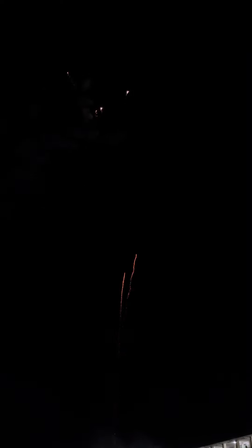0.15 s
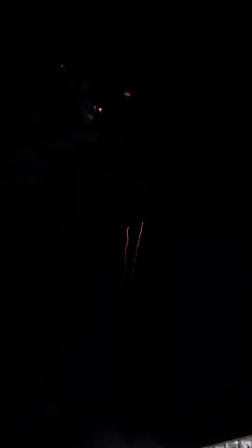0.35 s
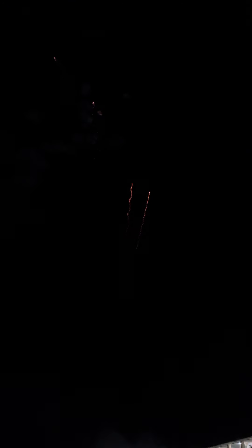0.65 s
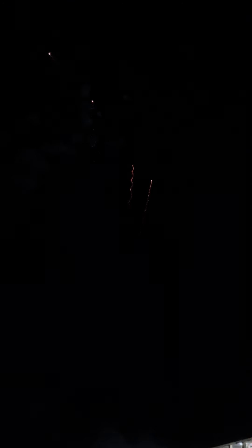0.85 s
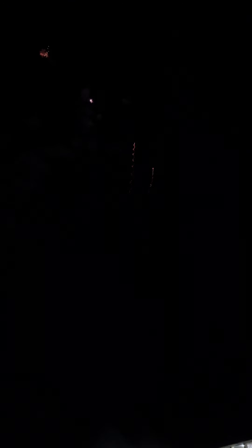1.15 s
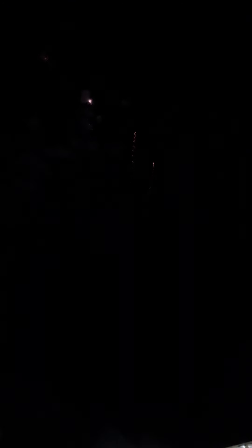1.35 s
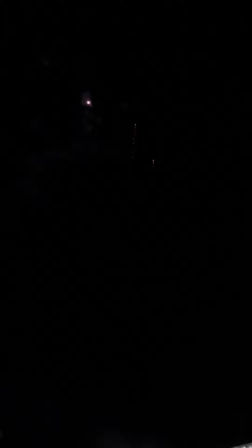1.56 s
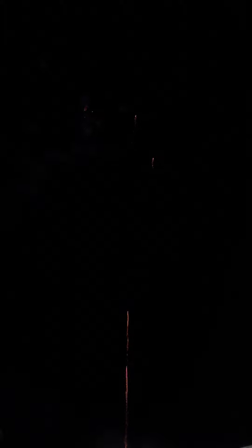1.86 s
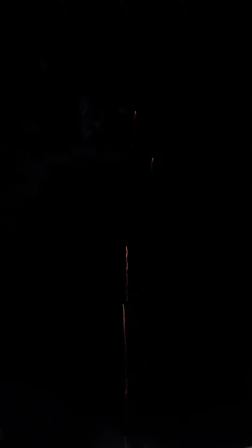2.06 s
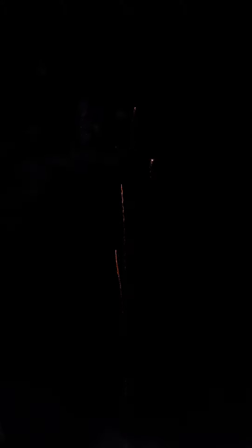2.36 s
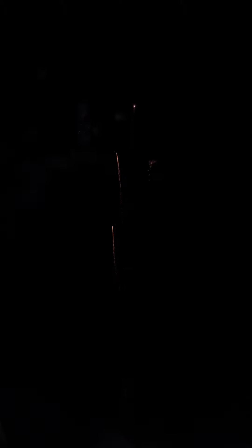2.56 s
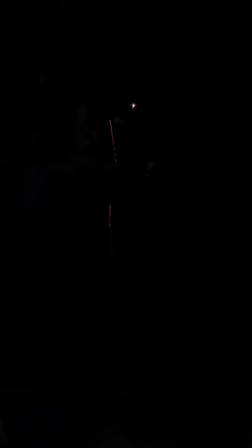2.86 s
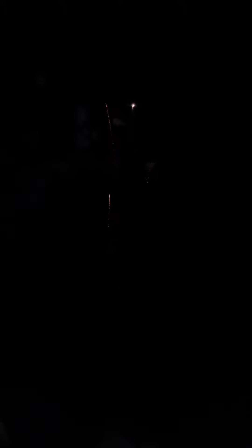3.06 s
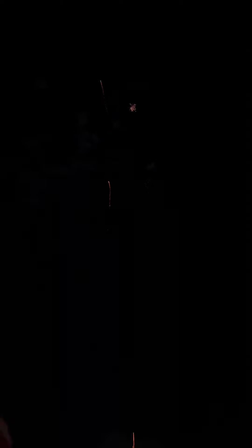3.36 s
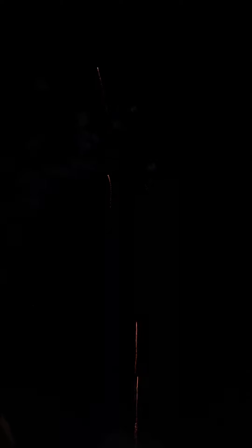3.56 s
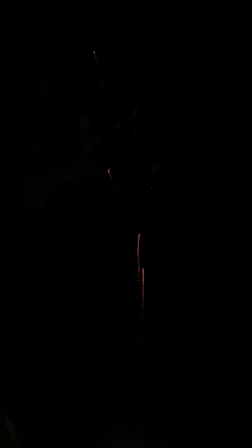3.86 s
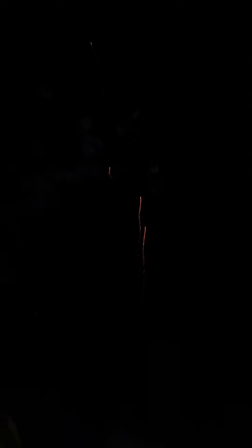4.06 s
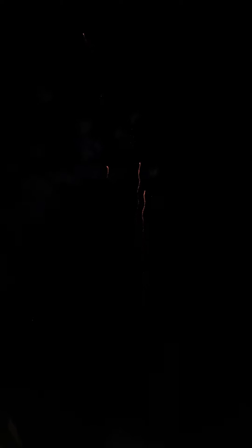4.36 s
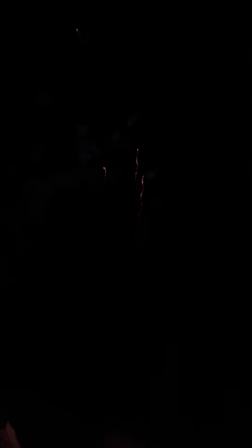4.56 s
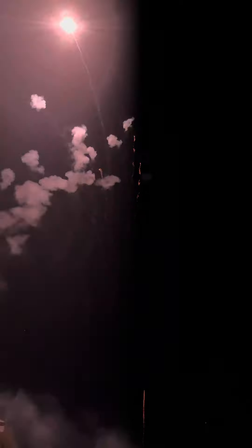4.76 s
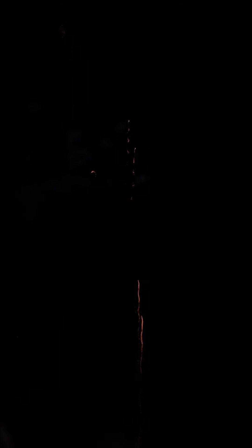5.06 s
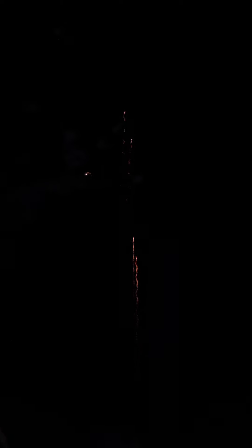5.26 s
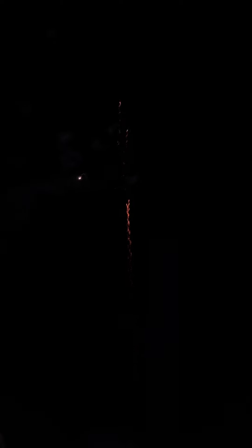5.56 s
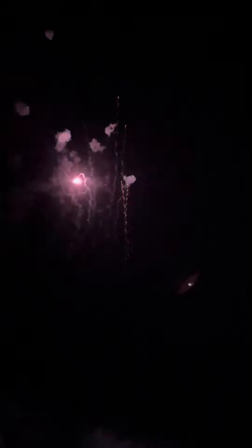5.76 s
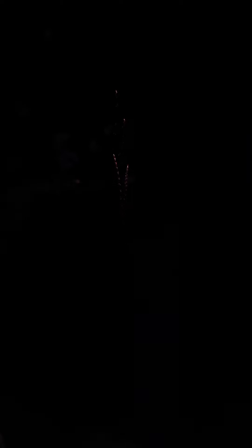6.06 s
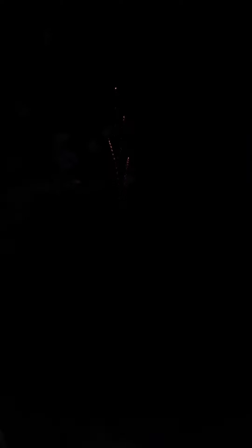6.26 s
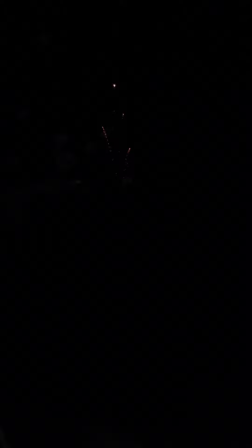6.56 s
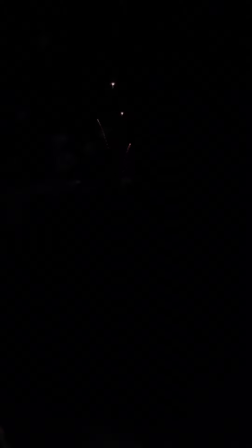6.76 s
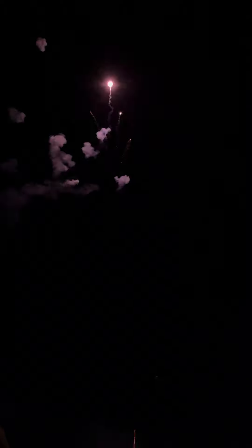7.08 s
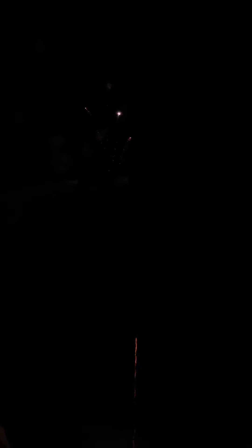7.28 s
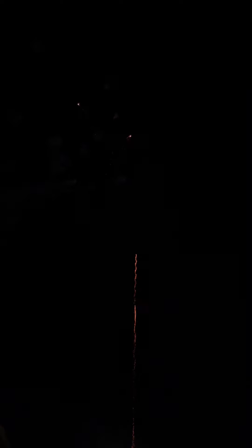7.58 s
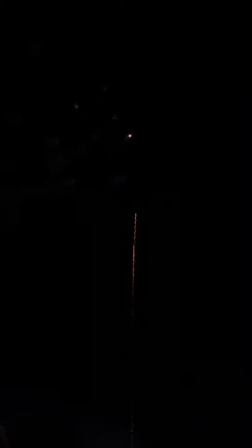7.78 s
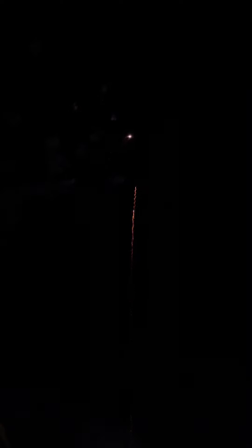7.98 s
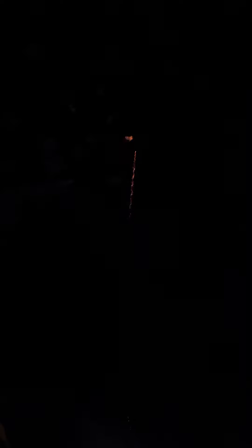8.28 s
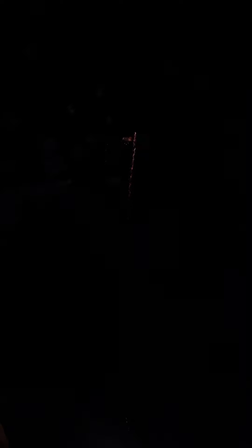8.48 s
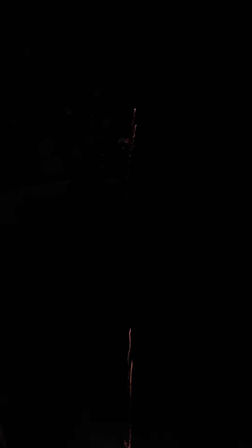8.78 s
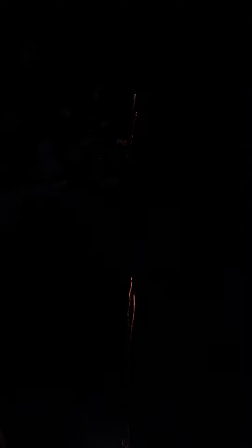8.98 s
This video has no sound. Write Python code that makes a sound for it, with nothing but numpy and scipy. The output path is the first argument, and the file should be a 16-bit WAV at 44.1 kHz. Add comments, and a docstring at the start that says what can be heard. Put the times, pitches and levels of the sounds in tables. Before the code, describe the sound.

Sharp firework bangs crack high overhead every half second to second and a half, each rolling into deep echoing rumble, with dull mortar thumps between.

```python
"""Sharp salute-shell cracks burst high over open ground at night; mortars nearby hiss, thump and ring.
Each blast is a pressure jump with a suction tail, heard direct and again off the ground and walls.
Far walls and trees answer as a rumble of band-filtered noise that dies away band by band.
Broad peaks and dips colour the whole stereo sound, all-pass filters smear each blast into a falling
chirp, and a limiter holds the peaks."""
import sys
import numpy as np
from scipy import signal
from scipy.io import wavfile
from scipy.ndimage import uniform_filter1d, minimum_filter1d

SR = 44100
rng = np.random.default_rng(int(sys.argv[2]) if len(sys.argv) > 2 else 0)


def bounce(signal):
    """Save signal as a 16-bit WAV file at the path given by the first command-line argument."""
    frames = np.transpose(np.atleast_2d(signal))
    limited = np.clip(frames, -1, 1)
    pcm = np.round(limited * 32767).astype(np.int16)
    wavfile.write(sys.argv[1], SR, pcm)


N = 402633
STEP = 64        # samples between values of a slow control signal
RUN_IN = 4096    # samples that sound before the first moment
BLAST_S = 0.0028    # time constant of a shell's blast
GROUND_BASS_DB = -9.5    # long waves in the ground bounce, relative to the blast
# Shell bursts: (time [s], blast level [dB], ground bounce lag [ms], lag of the big wall's answer [ms])
SHELL_BURSTS = [(0.638, 13, 7.1, 80), (0.948, 11.5, 6.5, 74), (1.4415, 13.5, 7.7, 87),
                (2.047, 13.5, 7.3, 89), (2.771, 12, 6.7, 85), (3.6934, 11.5, 7.1, 88),
                (5.1418, 13, 7.9, 54), (6.12, 12.5, 6.2, 60), (7.4749, 12.5, 7.1, 92), (7.797, 11, 7.3, 88),
                (8.0656, 12, 7.5, 85), (8.6202, 10.5, 6.8, 98)]
# Mortar launches: (time [s], gas jet level [dB], jet whistle [Hz], thump level before shared gains [dB],
# colour of the wall slap [Hz], wall slap level [dB])
MORTAR_LAUNCHES = [(-0.0615, -31, 2770, 1, 1130, -4), (1.763, -23.5, 2500, 0.5, 1070, -7),
                   (1.8066, -31, 2500, 0.5, 1080, -12), (3.4677, -21, 2820, 0.4, 1130, -3),
                   (3.5755, -24, 2880, 1, 1060, -5), (4.773, -23, 3020, -0.5, 894, -4),
                   (4.8944, -19.5, 3740, 2.3, 960, -3), (7.15, -27.5, 2900, -3.5, 1450, -3),
                   (7.4065, -25, 2730, 0, 950, 1), (8.594, -26, 2860, 1, 1100, 1),
                   (8.725, -30.5, 3200, -5, 1080, -6)]


def from_db(db):
    """A level is a logarithm of amplitude: 20 dB for each factor of ten."""
    return 10 ** (np.asarray(db) / 20)


def at_hz(points, hz):
    """Spectral curves are interpolated on a logarithmic frequency axis."""
    log_hz, values = np.log(np.array(points)[:, 0]), np.array(points)[:, 1]
    return np.interp(np.log(hz), log_hz, values)


def drift(rate):
    """Low-passed noise wanders slowly: spread 1, corner at rate [Hz], one value every STEP samples."""
    r = np.exp(-2 * np.pi * rate * STEP / SR)
    white = rng.standard_normal(N // STEP + 1002)
    slow = signal.lfilter([1], [1, -2 * r, r * r], white)[1000:]
    return slow / slow.std()


def clicks(times, db):
    """An impulse is one sample at its moment, over a floor far below hearing."""
    out = np.full(N, 1e-18)
    samples = np.clip(np.round(np.asarray(times) * SR).astype(int), 0, N - 1)
    np.add.at(out, samples, from_db(db))
    return out


def dull(x, hz):
    """A first-order loss: one-pole low-pass."""
    r = np.exp(-2 * np.pi * hz / SR)
    return signal.lfilter([1 - r], [1, -r], x)


def resonance(x, hz, width_hz):
    """A damped oscillator passes a band round its own frequency: two poles, gain 1 on top."""
    r, w = np.exp(-np.pi * width_hz / SR), 2 * np.pi * hz / SR
    return signal.lfilter([(1 - r * r) / 2, 0, (r * r - 1) / 2], [1, -2 * r * np.cos(w), r * r], x)


def blast(x, length_s):
    """A blast wave jumps, then sags into suction: (1 - t/T) exp(-t/T), here with inverted sign."""
    r = np.exp(-1 / (length_s * SR))
    return -signal.lfilter([1, -1], [1, -2 * r, r * r], x)


def onset_db(age, rise_s):
    """Echo build-up: silence before the blast, then a straight rise in amplitude."""
    return 20 * np.log10(np.clip(age / rise_s, 1e-9, 1))


def shifted(x, lag_s):
    """Travel time delays a wave, even by a fraction of a sample."""
    return np.interp(np.arange(N) - lag_s * SR, np.arange(N), x)


def bursts():
    """Blast waves superpose: direct, near bounces, scattered spray and a duller ground bounce."""
    scatter_db, scatter_s, scatter_low_hz = -14, .006, 3500
    near_s, near_db, near_spread_db, near_low_hz = 0.0037, -20, 4, 450
    holder_s, holder_db = .00155, -8    # a second shock off whoever holds the microphones
    ground_db = [-3.5, -12]    # left, right
    ground_dull_hz, ground_bass_hz, ground_left_late_ms = 3800, 166, 0.23
    fence_s, fence_db, fence_dull_hz = .019, -15, 500    # something broad a few steps away
    blast_dull_hz = 2970
    s, level_db, lag_ms = np.transpose(SHELL_BURSTS)[:3]
    s = s + .0007    # the jump follows the first rise
    # Small things close by throw back a short spray of treble.
    fading = np.exp(-np.arange(round(0.084 * SR)) / SR / scatter_s)
    spray = signal.fftconvolve(clicks(s + 0.0017, level_db + scatter_db), fading)[:N]
    chance = rng.standard_normal((len(s), 2))
    out = []
    for side in range(2):
        bounces = spray * rng.standard_normal(N) * (rng.random(N) < .15)
        for _ in range(2):    # bass removed twice
            bounces = bounces - dull(bounces, scatter_low_hz)
        # The near bounce has its own lag and level for every shell.
        bounce_s = s + near_s + 0.0007 * chance[:, 0]
        near = clicks(bounce_s, level_db + near_db + near_spread_db * chance[:, 1])
        near += clicks(s + holder_s, level_db + holder_db)
        direct = clicks(s, level_db) + bounces + near - dull(near, near_low_hz)
        ground_s = s + (lag_ms + ground_left_late_ms * (1 - side)) / 1000
        ground = dull(clicks(ground_s, level_db + ground_db[side]), ground_dull_hz)
        ground += dull(clicks(ground_s, level_db + GROUND_BASS_DB), ground_bass_hz)
        out.append(dull(blast(direct + ground, BLAST_S), blast_dull_hz))
    out, lag = np.array(out), round(fence_s * SR)
    out[:, lag:] += from_db(fence_db) * dull(out[:, :-lag], fence_dull_hz)
    return out


def launches():
    """Gas leaks past the climbing shell, the muzzle thumps, the tube resonates and walls reflect."""
    rise_s, fall_s, peak_s = 0.0055, 0.0025, .001    # the hiss peaks just after the shell leaves
    jet_band_hz, jet_width_hz, jet_ring_db = [1700, 7440], 800, 6    # the gap whistles broadly
    top_hz, top_width_hz, top_db = 6000, 1150, 0.5    # and rings higher up
    thump_s, thump_dull_hz, thump_gain_db = 0.00048, 273, 11.5
    backflow_s, backflow_db = .0041, -5.4    # air rushes back: the same pulse upside down
    slap_s, slap_width_hz = .0325, 400    # the nearer wall returns part of the muzzle's jump
    fray_s, fray_db = .014, -6    # that wall is uneven: its slap frays
    far_wall_s, far_wall_db = .063, -8    # a farther wall returns the whole launch
    # Air modes of the mortar tube: (frequency [Hz], width [Hz], level [dB])
    tube_modes = [(66.3, 5.9, 27), (449, 28.6, 10.5)]
    s, jet_db, jet_hz, thump_db, slap_hz, slap_db = np.transpose(MORTAR_LAUNCHES)
    exit_s = s + 0.0029 + RUN_IN / SR
    t = np.arange(round(0.025 * SR)) / SR
    swell = np.where(t < rise_s, t / rise_s, np.exp(-(t - rise_s) / fall_s))

    noise = rng.standard_normal(N) + 1.16 * rng.standard_normal((2, N))    # partly shared by the sides
    hiss = signal.sosfilt(signal.butter(2, jet_band_hz, "band", fs=SR, output="sos"), noise)
    hiss += from_db(top_db) * resonance(hiss, top_hz, top_width_hz)
    jet = np.zeros((2, N))
    starts = ((exit_s + peak_s - rise_s) * SR).astype(int)
    for start, level_db, hz in zip(starts, jet_db, jet_hz):
        span = slice(start, start + len(t))
        gas = hiss[:, span]
        whistling = gas + from_db(jet_ring_db) * resonance(gas, hz, jet_width_hz)
        jet[:, span] = from_db(level_db) * swell * whistling

    shot = clicks(exit_s, thump_db)
    muzzle = blast(shot, thump_s)
    pushed = muzzle - blast(clicks(exit_s + backflow_s, thump_db + backflow_db), thump_s)
    # The muzzle points away, so its thump arrives dull.
    thump = from_db(thump_gain_db) * signal.lfilter(*signal.butter(2, thump_dull_hz, fs=SR), pushed)
    direct = jet + thump
    for hz, width_hz, level_db in tube_modes:
        direct += from_db(level_db) * resonance(thump, hz, width_hz)

    fraying = signal.fftconvolve(shot, np.exp(-t / fray_s))[:N]
    fraying = fraying * rng.standard_normal((2, N)) * (rng.random((2, N)) < .03)
    frayed = muzzle + from_db(fray_db) * blast(fraying, thump_s)
    out = direct.copy()
    lag, length = round(slap_s * SR), len(t) + 300
    for start, hz, level_db in zip((exit_s * SR).astype(int), slap_hz, slap_db):
        slap = resonance(frayed[:, start:start + length], hz, 2 * slap_width_hz)
        slap = resonance(slap, hz, slap_width_hz)
        out[:, start + lag:start + lag + length] += from_db(level_db) * slap
    lag = round(far_wall_s * SR)
    out[:, lag:] += from_db(far_wall_db) * direct[:, :-lag]
    return np.pad(out[:, RUN_IN:], [(0, 0), (0, RUN_IN)])


def echoes():
    """Specular reflection off large walls returns whole blasts; uneven surfaces dull and fray them."""
    wall_gain_db, wall_spread_db = -13, 5    # one big wall answers every burst
    fray_s, fray_db, echo_dull_hz = 0.0068, -17, 473
    # Single echoes, loud and faint, within the rumble: (time [s], level [dB])
    single_echoes = [(0.053, -11), (0.182, -17), (0.241, -15), (0.794, -1.5), (1.134, 0.5), (1.169, 1),
                     (1.256, -20.5), (1.673, 2.5), (1.745, -2), (2.251, 1), (2.293, -4.5), (2.421, -1),
                     (3.034, -9), (3.16, -19), (3.879, -3), (3.941, -6), (4.104, -33), (4.291, -15),
                     (4.339, -11.5), (5.32, 0), (5.414, -2.5), (5.464, 3), (5.513, -1), (5.672, -6),
                     (5.764, -7.5), (5.825, -13), (6.21, -6), (6.294, 1.5), (6.378, -8), (6.473, -14),
                     (6.525, -11), (6.728, -11.5), (6.775, -11), (7.626, 1.5), (8.236, -6.5), (8.355, -11),
                     (8.667, 0.5), (8.875, -11), (8.954, -5.5), (9.021, -12)]
    burst_s, burst_db, lag_ms, wall_ms = np.transpose(SHELL_BURSTS)
    wall_s = burst_s + wall_ms / 1000
    wall_db = burst_db + wall_gain_db + wall_spread_db * rng.standard_normal(len(SHELL_BURSTS))
    wall = clicks(wall_s, wall_db)
    wall += clicks(wall_s + lag_ms / 1000, wall_db + GROUND_BASS_DB)    # the ground bounce returns too
    fronts = wall + clicks(*np.transpose(single_echoes))
    fading = np.exp(-np.arange(round(.05 * SR)) / SR / fray_s)
    fraying = signal.fftconvolve(fronts, fading)[:N]
    fraying = fraying * rng.standard_normal((2, N)) * (rng.random((2, N)) < .03)
    returned = blast(fronts + from_db(fray_db) * fraying, BLAST_S)
    return dull(dull(returned, echo_dull_hz), echo_dull_hz)


def whooshes():
    """Narrow-band noise: hiss through two equal resonances, quick to rise and slow to fade."""
    # Hiss that hangs in the air after launches, perhaps the climbing shells:
    # (start [s], length [s], centre [Hz], width of each resonance [Hz], level [dB])
    hisses = [(0.036, 0.59, 920, 130, -43), (1.818, 0.055, 2570, 301, -38), (1.932, 0.045, 2740, 500, -41),
              (1.977, 0.099, 2720, 600, -46), (4.843, 0.035, 2520, 505, -41),
              (4.925, 0.088, 2740, 248, -45), (7.204, 0.034, 2090, 260, -43), (7.31, 0.13, 2400, 303, -50)]
    flicker_db = 2.5
    t, out, noise = np.arange(N) / SR, 0, rng.standard_normal((2, N))
    for start_s, length_s, hz, width_hz, level_db in hisses:
        narrow = resonance(resonance(noise, hz, width_hz), hz, width_hz)
        # The end values hold outside the hiss as a faint residue.
        shape = np.interp((t - start_s) / length_s, [0, .1, .7, 1], [0.0013, 1, 0.46, 0.012])
        shape *= from_db(flicker_db * np.repeat(drift(10.0), STEP)[:N])
        out = out + from_db(level_db) * shape * narrow / narrow.std()
    return out


def rumble(patchy_db):
    """Diffuse reverberation: countless echoes add in power and decay exponentially in each band."""
    # Spectrum of the rumble: (frequency [Hz], level of the noise density [dB])
    spectrum = [(25, -48), (45, -18.5), (75, 2.5), (120, 2), (200, -1), (300, -12), (400, -7.5), (750, -16),
                (1050, -17), (1600, -31.5), (3000, -39.5), (4000, -38), (6000, -34.5), (7600, -50.5),
                (9300, -60), (11500, -38), (16000, -63)]
    # Reverberation time: (frequency [Hz], time to fall 60 dB [s])
    decay_times = [(40, 2.08), (120, 1.846), (400, 1.453), (1500, 1.54), (2600, 1.65), (3600, 1.77),
                   (5000, 1.233), (12000, 0.87)]
    # Left-right correlation: (frequency [Hz], likeness, clipped to -1..1 after interpolation)
    likeness = [(60, 0.99), (150, 0.98), (380, 0.96), (700, 0.34), (1300, -0.26), (2400, 0.73),
                (6000, 0.93), (9000, 0.94), (12000, -1.6)]
    # Balance: (frequency [Hz], left over right [dB])
    balance = [(60, 0.5), (150, -4), (380, -1), (950, -6), (2380, 0.5), (5980, -1.5), (15000, -1.5)]
    # Launch rumble over the thump level, added to the spectrum: (frequency [Hz], level [dB])
    launch_colour = [(40, 17), (100, -3), (420, -2.5), (700, -3), (1400, 3), (2000, 4.5), (2800, 8),
                     (4500, 4), (12000, 1.5)]
    # How unevenly echoes arrive: (frequency [Hz], level per unit of shared drift [dB])
    lumpiness = [(60, -0.5), (300, -0.12), (1500, 0.45), (8000, 1)]
    earlier_s, earlier_db = -1.1, 6    # a burst already rolling away
    burst_gain_db, onset_s = -12, 0.0066    # first echoes build up
    growth_db_s = 6.5    # ever more ground answers a burst high in the air
    trees_s, trees_spread_s, trees_db = 0.16, 0.032, 5.5    # far tree line and walls join in
    launch_gap_s, launch_onset_s = 0.012, 0.034    # open ground round the mortars
    gap_db = -11    # shrubs still scatter a little in the gap
    bass_late_cycles, bass_latest_s = 9, 0.064    # long waves need big, far reflectors
    night_db, night_dull_hz = -24, 5500    # far hum of the area, shaped by the spectrum, treble lost
    t = np.arange(N // STEP + 2) * STEP / SR
    far_rows = [(earlier_s, earlier_db)] + [row[:2] for row in SHELL_BURSTS]
    far_s, far_db = np.transpose(far_rows)[:, :, None]
    near_s, near_db = np.transpose([row[:4:3] for row in MORTAR_LAUNCHES])[:, :, None]
    age = np.maximum(t - np.concatenate([far_s, near_s]), 0)
    lumps = drift(11.8) + 0.3 * drift(32.0)    # stronger echoes lift neighbouring bands together
    white = rng.standard_normal((2, 2, N + RUN_IN))
    edges = 22 * 2 ** np.arange(0, 9.6, 1 / 3)    # third octaves
    out = 0
    for k, (low, high) in enumerate(zip(edges, edges[1:])):
        hz = np.sqrt(low * high)
        since = t - far_s - min(bass_late_cycles / hz, bass_latest_s)
        far = far_db + burst_gain_db + onset_db(since, onset_s)
        far += growth_db_s * np.minimum(since, 1.2)
        far += trees_db * (1 + np.tanh((since - trees_s) / trees_spread_s)) / 2
        walls_db = onset_db(t - near_s - launch_gap_s, launch_onset_s)
        shrubs_db = gap_db + onset_db(t - near_s, onset_s)
        near = near_db + at_hz(launch_colour, hz) + np.maximum(walls_db, shrubs_db)
        dying_db = np.concatenate([far, near]) - 60 * age / at_hz(decay_times, hz)
        night_power = from_db(night_db) ** 2 / (1 + (hz / night_dull_hz) ** 4)
        power = np.sum(from_db(dying_db) ** 2, axis=0) + night_power
        colour_db = at_hz(spectrum, hz) + at_hz(lumpiness, hz) * lumps + patchy_db * drift(15.0)
        gain = np.sqrt(power) * from_db(colour_db)
        # Neighbouring bands take turns with two independent noises.
        band = signal.butter(2, [low, high], "band", fs=SR, output="sos")
        mid, side = signal.sosfilt(band, white[k % 2])[..., RUN_IN:]
        alike = np.clip(at_hz(likeness, hz), -1, 1)
        pair = np.sqrt(1 + alike) * mid + np.sqrt(1 - alike) * side * [[1], [-1]]
        pair *= from_db([[at_hz(balance, hz)], [0]])
        out = out + np.interp(np.arange(N) / STEP, np.arange(len(t)), gain) * pair
    return out


def scene():
    """Superposition at two ports: small arrival lags, with less bass on the left."""
    mic_low_hz, shadow_hz = 99, 1640    # below the shadow corner the left port is quieter
    burst_left_db, ground_left_db = -1, -4.5    # from overhead both ports hear more alike
    right_lag_s = 0.00018    # the whole right side, rumble included
    # A lead brings bursts forward at the right port, most in the long waves.
    burst_lead_s, burst_bass_lead_s, burst_bass_hz = .00003, .0003, 1300
    low_cut = signal.butter(2, mic_low_hz, "high", fs=SR, output="sos")
    sources = np.array([bursts(), launches() + echoes() + whooshes()])
    shells, ground = signal.sosfilt(low_cut, sources)
    lost = (1 - from_db(burst_left_db)) * shells[0] + (1 - from_db(ground_left_db)) * ground[0]
    left = shells[0] + ground[0] - dull(lost, shadow_hz)
    bass = dull(shells[1], burst_bass_hz)
    right = shifted(shells[1] - bass, -burst_lead_s) + shifted(bass, -burst_bass_lead_s) + ground[1]
    left, right = np.array([left, right]) + rumble(patchy_db=1.97)
    return np.array([left, shifted(right, right_lag_s)])


def record(dry):
    """Resonant colour, all-pass dispersion that delays the bass, limiting, saturation and a top cut."""
    # Tone colour of the whole sound, broad peaks and dips: (frequency [Hz], width [Hz], level [dB])
    tone_colour = [(552, 180, -5), (714, 290, 1), (1025, 500, -2.5), (1340, 370, -1), (2590, 1010, 7.5),
                   (4787, 1380, -11.5), (9360, 1020, -13), (13300, 2700, -3), (14700, 3700, -13)]
    crossovers_hz, crossover_q = [143, 136, 352, 1440, 2870], 0.78
    limit_db, release_db_s, top, cutoff_hz = 2.5, 260, 1.05, 16400
    sos = []
    for hz, width_hz, level_db in tone_colour:
        a, c, g = np.pi * width_hz / SR, -2 * np.cos(2 * np.pi * hz / SR), from_db(level_db)
        sos.append(np.array([1 + a * g, c, 1 - a * g, 1 + a, c, 1 - a]) / (1 + a))
    for hz in crossovers_hz:    # summed crossover bands act as an all-pass
        w = 2 * np.pi * hz / SR
        a, c = np.sin(w) / (2 * crossover_q), -2 * np.cos(w)
        sos.append(np.array([1 - a, c, 1 + a, 1 + a, c, 1 - a]) / (1 + a))
    # A mirrored run-in lets the filters settle.
    x = signal.sosfilt(sos, np.pad(dry, [(0, 0), (RUN_IN, 0)], "reflect"))[:, RUN_IN:]
    over_db = np.maximum(20 * np.log10(np.abs(x).max(axis=0) + 1e-9) - limit_db, 0)
    ramp = release_db_s * np.arange(N) / SR
    held_db = np.maximum.accumulate(over_db + ramp) - ramp    # instant attack, steady release
    held_db = -minimum_filter1d(-held_db, size=89)    # looks 1 ms ahead
    held_db = uniform_filter1d(held_db, size=89)
    rounded = top * np.tanh(x * from_db(-held_db) / top)    # the highest crests are flattened
    return signal.sosfilt(signal.cheby2(12, 70, cutoff_hz, fs=SR, output="sos"), rounded)


dry = scene()
out = record(dry)
bounce(out)
```